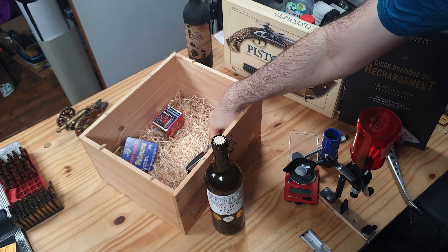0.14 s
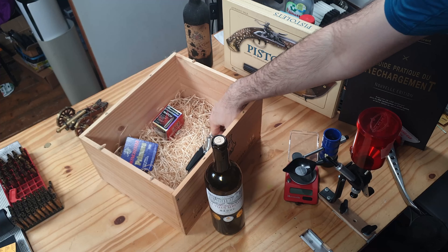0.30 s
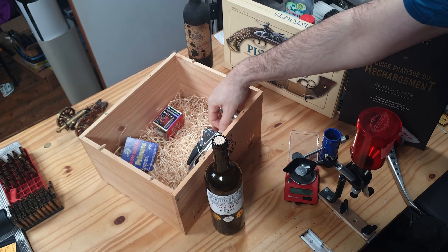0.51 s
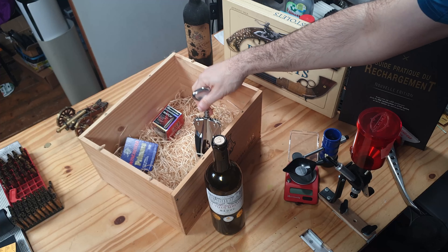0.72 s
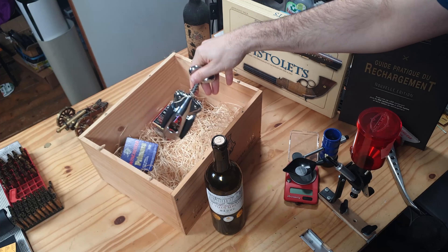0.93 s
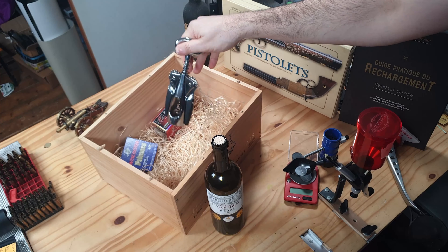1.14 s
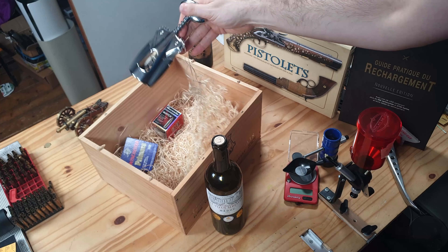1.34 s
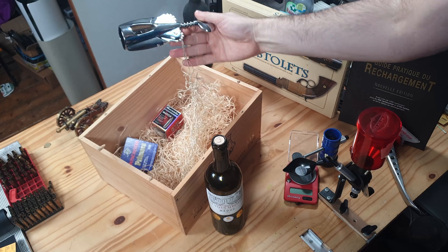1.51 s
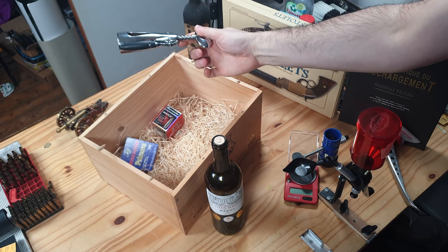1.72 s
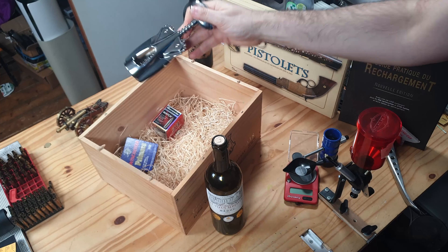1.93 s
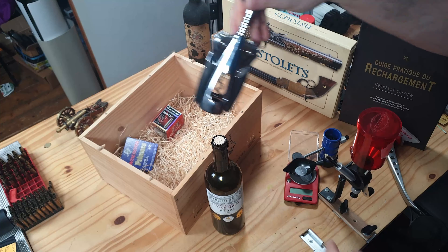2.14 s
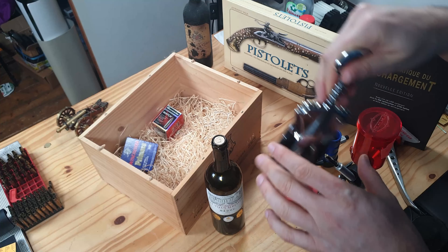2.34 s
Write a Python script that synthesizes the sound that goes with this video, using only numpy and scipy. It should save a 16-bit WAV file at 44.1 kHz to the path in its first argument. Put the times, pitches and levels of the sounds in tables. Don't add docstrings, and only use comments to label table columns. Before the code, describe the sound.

A metal corkscrew knocks hard on a wooden box and is pulled from crackling wood wool.

```python
import sys
import numpy as np
from scipy import signal
from scipy.io import wavfile

SR = 44100
rng = np.random.default_rng(int(sys.argv[2]) if len(sys.argv) > 2 else 0)


def how_loud(loudness_db):
    steps = np.asarray(loudness_db, float) / 20
    return 10 ** steps


def dump_mix(stems):
    frames = np.atleast_2d(stems).T
    limited = np.clip(frames, -1, 1)
    pcm = np.round(limited * 32767).astype(np.int16)
    wavfile.write(sys.argv[1], SR, pcm)


N = 110250


def rms_one(x):
    return x / np.sqrt(np.mean(x ** 2) + 1e-20)


def level(rows):
    s, db = np.transpose(rows)
    return how_loud(np.interp(np.arange(N) / SR, s, db))


def at_hz(points, hz):
    points_hz, points_db = np.array(points)[:, 0], np.array(points)[:, 1]
    return np.interp(np.log(hz), np.log(points_hz), points_db)


def pan(x, left_db):
    left = how_loud(left_db)
    return x * np.array([[left], [1]]) * 2 / (1 + left)


def decay(start_s, t60_s):
    t = np.arange(N) / SR - start_s
    return (t > 0) * how_loud(-60 * np.maximum(t, 0) / t60_s)


def drift(rate_hz):
    hop = 40
    r = np.exp(-2 * np.pi * hop * rate_hz / SR)
    noise = rng.standard_normal(N // hop + 2002)
    slow = signal.lfilter([1], [1, -2 * r, r * r], noise)[2000:]
    return np.interp(np.arange(N) / hop, np.arange(len(slow)), rms_one(slow))


def ring(x, hz, t60_s, phase_rad=0):
    r, w = how_loud(-60 / (t60_s * SR)), 2 * np.pi * hz / SR
    strike = [np.sin(phase_rad), r * np.sin(w - phase_rad)]
    return signal.lfilter(strike, [1, -2 * r * np.cos(w), r * r], x + 1e-18)


def resonate(x, hz, width_hz):
    r = np.exp(-np.pi * width_hz / SR)
    zeros = np.array([1, 0, -1]) * (1 - r * r) / 2
    return signal.lfilter(zeros, [1, -2 * r * np.cos(2 * np.pi * hz / SR), r * r], x)


def dip(x, hz, width_hz, depth):
    return x - np.clip(depth, 0, 1) * resonate(x, hz, width_hz)


def butter(x, order, hz, kind):
    return signal.sosfilt(signal.butter(order, hz, kind, fs=SR, output="sos"), x)


def grains(rate_per_s, spread_db):
    sizes = how_loud(spread_db * np.minimum(rng.exponential(1, N), 4)) * rng.choice([-1, 1], N)
    return rms_one(sizes * (rng.random(N) < rate_per_s / SR))


# (frequency [Hz], likeness [0..1])
LIKENESS = [(60, 0.25), (300, 0.13), (700, 0.05), (3000, 0.018)]


def coloured(x, spectrum, patchy_db, alike=None):
    out, edges_hz = 0, 25 * 2 ** np.arange(0, 9.6, 1 / 3)
    for k, (low, high) in enumerate(zip(edges_hz, edges_hz[1:])):
        hz = np.sqrt(low * high)
        if hz < spectrum[0][0] * .7:
            continue
        mid, side = butter(np.roll(x, 997 * k, axis=1), 2, [low, high], "band")
        c = np.clip(at_hz(LIKENESS, hz) if alike is None else alike, 0, 1)
        gain = how_loud(at_hz(spectrum, hz) + patchy_db * drift(7))
        out = out + gain * (np.sqrt(1 + c) * mid + np.sqrt(1 - c) * side * [[1], [-1]])
    return rms_one(out)


# (time [s], level [dB], hardness [Hz])
KNOCK = [
    (0.205, -20.5, 2545),
    (0.2079, -9.5, 1997),
    (.2112, -10, 1999),
    (.2145, -21, 1600),
    (.2195, -14.5, 1400),
    (.2245, -12, 1100),
    (0.2297, -15.5, 900),
]
# (frequency [Hz], level [dB], t60 [s], left minus right [dB])
BOX = [(127, -18, .3, 0), (220.3, -10, .56, 1.5), (328.4, -9.5, .1, 6), (430.4, 3, .16, 7.5),
       (584.2, -18, 0.081, 8), (644.5, -1, 0.11, 8), (838.3, -20.5, 0.23, 8), (875, -12.5, .12, 10.5),
       (933.6, -12.5, 0.14, 4.5), (1300, -24.5, 0.12, 7), (1585, -8, 0.11, 8), (1747, -27, 0.053, 7),
       (2041, -31.5, 0.04, 0.5), (505, -15, 0.07, 5.5)]
# (frequency [Hz], level [dB], t60 [s])
STEEL = [(4360, -33.5, 0.023), (6100, -34.5, .025), (11150, -29, .02), (12706, -28, .035),
         (14390, -28, 0.018)]
# (frequency [Hz], density [dB per Hz])
CRACK = [(1000, -24.5), (1600, -12.5), (3000, -14.5), (5500, -7.5), (8500, -19), (11000, -16),
         (13000, -11.5), (16000, -13)]
PANEL_TURN_RAD, PANEL_CUT_HZ = .7, 160
CRACK_DB, CRACK_T60_S, TAIL_DB, TAIL_T60_S, CRACK_PAN_DB = -16, 0.073, -31.5, 0.3, 12


def knock():
    t, pushes = np.arange(N) / SR, []
    for s, db, hard_hz in KNOCK:
        pulse = np.sin(np.pi * np.clip((t - s) * hard_hz, 0, 1)) ** 2
        pushes.append(-how_loud(db) * pulse * 2 * hard_hz / SR)
    body = 0
    for k, (hz, db, t60_s, pan_db) in enumerate(BOX):
        low = hz < 300
        force = 2 * pushes[1] if low else sum(pushes)
        turn_rad = PANEL_TURN_RAD * (-1) ** k * (not low)
        pair = np.array([ring(force, hz, t60_s), ring(force, hz, t60_s, turn_rad)])
        body = body + pan(how_loud(db) * pair, pan_db)
    for _ in range(2):
        body = butter(body, 2, PANEL_CUT_HZ, "high")
    ticks = np.zeros(N)
    ticks[[int(s * SR) for s, _, _ in KNOCK[1:4]]] = 1
    steel = sum(how_loud(db) * ring(ticks, hz, t60_s) for hz, db, t60_s in STEEL)
    burst_gain = sum(how_loud(db + CRACK_DB) * decay(s, CRACK_T60_S) for s, db, _ in KNOCK[:3])
    burst_gain = burst_gain + how_loud(TAIL_DB) * decay(KNOCK[1][0], TAIL_T60_S)
    burst = burst_gain * coloured(rng.standard_normal((2, N)), CRACK, patchy_db=4.5, alike=0.55)
    return body + pan(steel + burst, CRACK_PAN_DB)


WOOD_TAIL_DB, WOOD_TAIL_T60_S, WOOD_TAIL_HZ = -36, .5, 1100


def wood_wash():
    wash = butter(rng.standard_normal((2, N)), 2, 300, "high")
    wash = rms_one(butter(wash, 1, WOOD_TAIL_HZ, "low"))
    return pan(how_loud(WOOD_TAIL_DB) * decay(KNOCK[1][0], WOOD_TAIL_T60_S) * wash, left_db=6.5)


# (time [s], level [dB])
DRAG = [
    (.47, -70.5),
    (.51, -49.5),
    (.55, -47.5),
    (.565, -46),
    (.59, -40.5),
    (.62, -51),
    (.64, -61.5),
    (.67, -91),
]
# (frequency [Hz], width [Hz], level [dB])
DRAG_RES = [(331, 59, 0), (420, 34, -3.5), (270, 50, -8), (610, 50, -7.5), (1348.5, 81, -21),
            (172.3, 60, -11.5), (1900, 500, -18.5)]


def drag():
    slips, tone = grains(rate_per_s=1500, spread_db=2.8), 0
    for hz, width_hz, db in DRAG_RES:
        band = resonate(resonate(slips, hz, width_hz), hz, 1.5 * width_hz)
        tone = tone + how_loud(db + 1.5 * drift(5.2)) * rms_one(band)
    return pan(level(DRAG) * rms_one(tone), left_db=9.5)


# (time [s], level [dB])
STIR = [(0, -55), (.07, -57.5), (.11, -52.5), (.19, -45.5), (.47, -53.5), (.585, -54.5), (.66, -58.5),
        (.75, -56.5), (.86, -65), (1.08, -56.5), (1.22, -59), (1.36, -52), (1.47, -58.5), (1.54, -79.5),
        (1.63, -61.5), (1.7, -57.5), (1.745, -48.5), (1.85, -78.5),
        (2.38, -86),
    (2.425, -63),
    (2.5, -69),
]
# (time [s], level over the rustle [dB])
SNAPS = [(.455, 6.5), (.567, 10.5), (0.584, 8), (.632, 0.5), (.888, 8.5), (.94, 2.5), (1.0, -10), (1.06, 5),
         (1.599, 5), (1.635, 9.5), (2.196, 24), (2.415, -1)]
# (frequency [Hz], density [dB per Hz])
WOOL = [(900, -29.5), (1500, -14), (3200, -13), (5500, -3), (7400, -2.5), (9500, -9.5), (12700, -3.5),
        (16000, -2.5)]
WOOL_PAN_DB, STRANDS_PER_S, GRAIN_SHARE, SNAP_T60_S = 13.5, 6300, 0.59, 0.027


def wool():
    rustle = np.array([GRAIN_SHARE * grains(STRANDS_PER_S, spread_db=1.0) + rng.standard_normal(N)
                       for _ in "lr"])
    snaps = sum((how_loud(db) - 1) * decay(s, SNAP_T60_S) for s, db in SNAPS)
    gain = level(STIR) * how_loud(1.1 * drift(25)) * (1 + snaps)
    return pan(gain * coloured(rustle, WOOL, patchy_db=0.5, alike=0.16), WOOL_PAN_DB)


# (time [s], length [s], level [dB], pitch [Hz], width [Hz])
BRUSHES = [(0, .035, -70, 400, 350), (.085, .16, -62, 1400, 1300), (.12, .1, -60, 500, 700),
           (.552, .06, -56, 1080, 70), (.555, .055, -62, 3500, 4000), (.585, .07, -56, 600, 50),
           (.68, .2, -75, 380, 250), (1.14, .09, -73, 1800, 1200), (1.15, .1, -76, 650, 35),
           (1.335, .14, -75, 660, 50), (1.35, .14, -69, 2000, 1600), (1.345, .135, -72, 990, 140),
           (1.375, .06, -71, 1660, 90), (1.725, .06, -72, 2700, 600), (1.735, .085, -75, 960, 45),
           (1.755, .09, -76, 435, 30), (2.05, .28, -77, 290, 60), (2.35, .16, -74, 290, 70)]


def brushes():
    t, out = np.arange(N) / SR, 0
    for s, length_s, db, hz, width_hz in BRUSHES:
        tone = resonate(resonate(rng.standard_normal(N), hz, width_hz), hz, 3 * width_hz)
        swell = np.sin(np.pi * np.clip((t - s) / length_s, 0, 1))
        out = out + how_loud(db + 5.5) * swell * rms_one(tone)
    return pan(out, left_db=13.5)


# (time [s], level [dB], weak mode [Hz], main mode [Hz], rattle [s])
CLINKS = [
    (.63, -53.5, 7400, 6050, 0.0078),
    (1.992, -70, 5900, 4023, 0.012),
    (2.193, -56, 1837, 4760, 0.031),
    (2.275, -68, 6660, 5130, 0.019),
    (2.414, -60.5, 2780, 5780, 0.0095),
]
# (frequency ratio, level [dB])
CLUSTER = [(1, 0), (.925, -7), (1.04, -9), (1.33, -10)]
CLINK_T60_S, CLINK_NOISE_DB, CLINK_WEAK_DB, CLINK_PAN_DB = .045, -2, -9.5, 16


def clinks():
    t, out = np.arange(N) / SR, 0
    fizz = rms_one(butter(rng.standard_normal(N), 2, [4200, 7500], "band"))
    for s, db, weak_hz, main_hz, rattle_s in CLINKS:
        hits = .08 * grains(1500, spread_db=2.5) * decay(s, 6 * rattle_s) * (t < s + rattle_s)
        hits[int(s * SR)] += .6
        modes = 0
        for ratio, ratio_db in CLUSTER:
            weak = how_loud(CLINK_WEAK_DB) * ring(hits, weak_hz * ratio, CLINK_T60_S)
            modes = modes + how_loud(ratio_db) * (weak + ring(hits, main_hz * ratio, CLINK_T60_S))
        out = out + how_loud(db) * (modes + how_loud(CLINK_NOISE_DB) * fizz * decay(s, rattle_s * 7))
    return pan(out, CLINK_PAN_DB)


# (time [s], level [dB])
SHAKE = [
    (0.0, -71.5),
    (0.23, -48),
    (0.85, -71.5),
    (1.13, -56),
    (2.5, -89),
]
TABLE_HZ, TABLE_WIDTH_HZ, TABLE_PAN_DB = 59.3, 5.2, -2


def table():
    mid, side, lumps = rng.standard_normal((3, N))
    hum_mid, hum_side = [rms_one(resonate(resonate(v, TABLE_HZ, TABLE_WIDTH_HZ), TABLE_HZ, 40))
                         for v in (mid, side)]
    even = rms_one(hum_mid / (np.abs(signal.hilbert(hum_mid)) + .5))
    thud = rms_one(butter(lumps, 2, [35, 170], "band"))
    return pan(level(SHAKE) * (even + .3 * hum_side * [[1], [-1]] + 0.4 * thud), TABLE_PAN_DB)


ROOM_T60_S, WALL_CUT_HZ, ROOM_DB = 0.31, 5000, -19


def room(x):
    out, dull = np.zeros((2, N)), np.exp(-2 * np.pi * WALL_CUT_HZ / SR)
    lags = (rng.uniform(.012, .035, 16) * SR).astype(int)
    for k, lag in enumerate(lags):
        loop, gain, state = x.copy(), how_loud(-60 * lag / SR / ROOM_T60_S), [0.]
        for i in range(lag, N, lag):
            back, state = signal.lfilter([gain * (1 - dull)], [1, -dull], loop[i - lag:i], zi=state)
            loop[i:i + lag] += back[:N - i]
        out[k % 2] += (loop - x) * (-1) ** (k // 2)
    return out


# (frequency [Hz], density [dB per Hz])
FLOOR = [(30, -7), (150, -10), (300, -10), (500, -16), (1500, -19), (2600, -21), (4500, -27),
         (16000, -33.5)]
FLOOR_DB = -70
FAN_DB, FAN_HZ, FAN_WIDTH_HZ, FAN_PAN_DB = -80, 2340, 350, -5


def floor():
    band = np.array([rms_one(resonate(resonate(v, FAN_HZ, FAN_WIDTH_HZ), FAN_HZ, 2 * FAN_WIDTH_HZ))
                     for v in rng.standard_normal((2, N))])
    tone = coloured(rng.standard_normal((2, N)), FLOOR, patchy_db=.5)
    return how_loud(FLOOR_DB) * tone + pan(how_loud(FAN_DB) * band, FAN_PAN_DB)


def scene():
    hard = knock() + drag() + clinks()
    echoes = how_loud(ROOM_DB) * room(hard.mean(axis=0))
    return hard + echoes + wood_wash() + wool() + brushes() + table() + floor()


def top_cut(x):
    return signal.sosfilt(signal.butter(12, 16420, fs=SR, output="sos"), x)


HISS_DB, HISS_HZ, CUTOFF_HZ, CEILING = -77, 10500, 15850, .995


def record(dry):
    left = dip(dry[0], hz=8460, width_hz=3200, depth=.75)
    right = dip(dry[1], hz=13800, width_hz=6900, depth=0.95)
    right = dip(right, hz=6200, width_hz=4300, depth=.75)
    hiss = butter(rng.standard_normal((2, N)), 2, HISS_HZ, "high")
    mics = np.array([left, right]) + how_loud(HISS_DB) * hiss
    mics = signal.sosfilt(signal.ellip(10, .5, 40, CUTOFF_HZ, fs=SR, output="sos"), mics)
    return top_cut(np.clip(mics, -CEILING, CEILING))


dry = scene()
out = record(dry)
dump_mix(out)
```